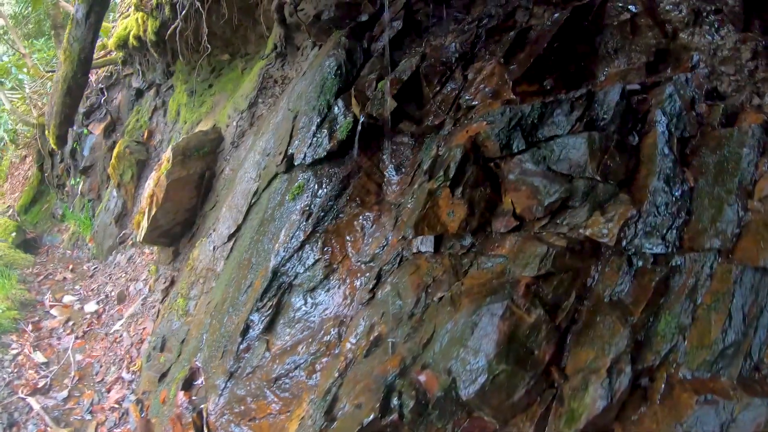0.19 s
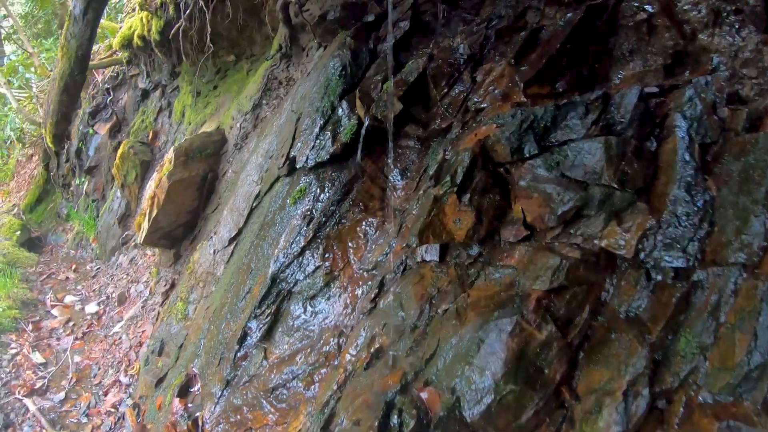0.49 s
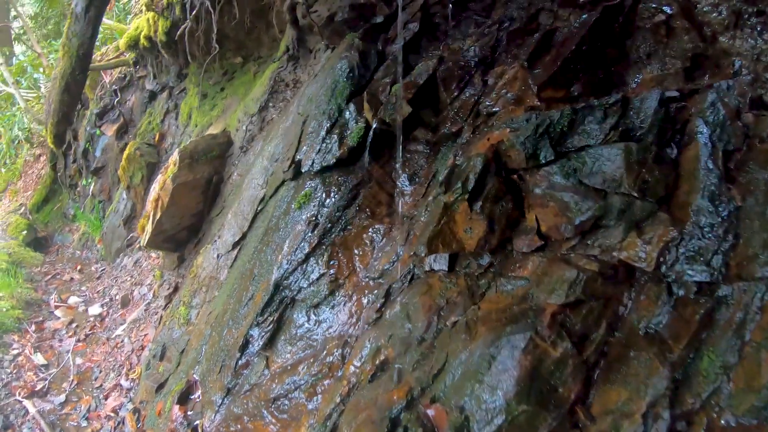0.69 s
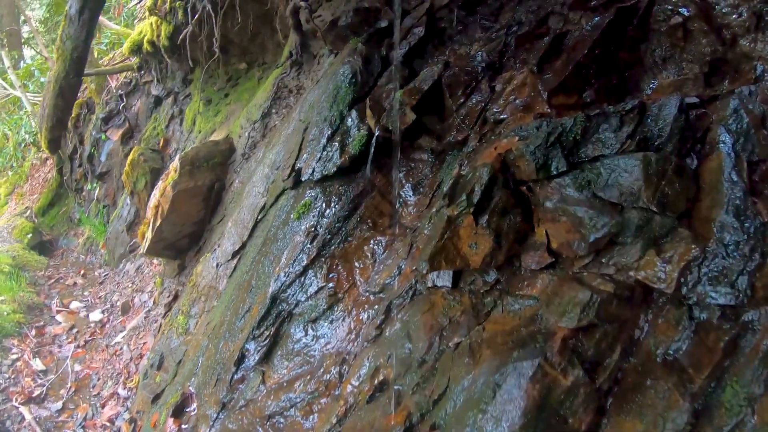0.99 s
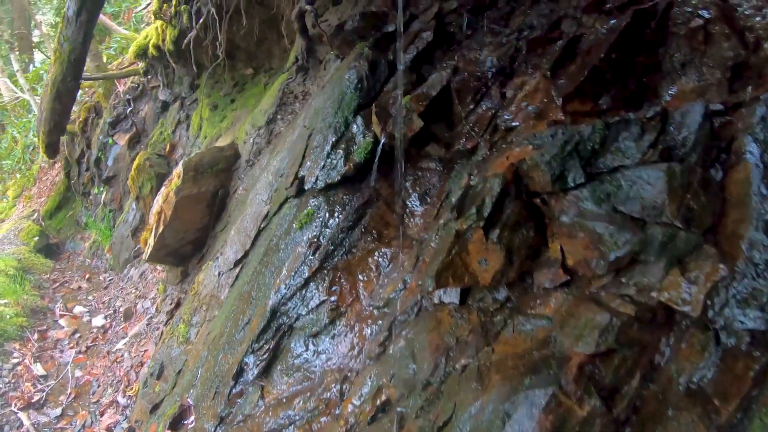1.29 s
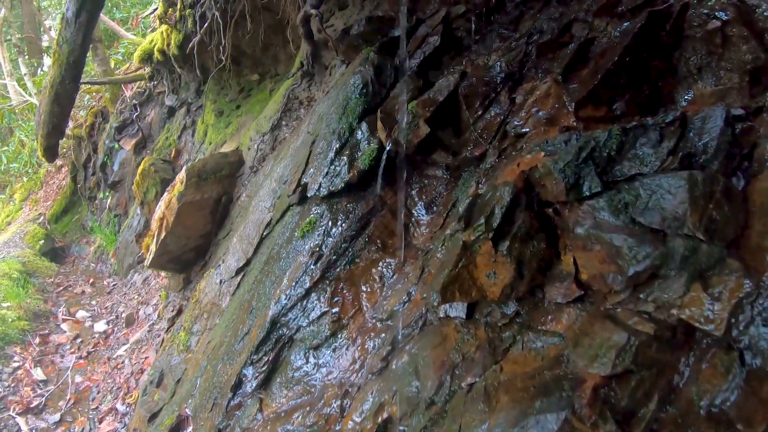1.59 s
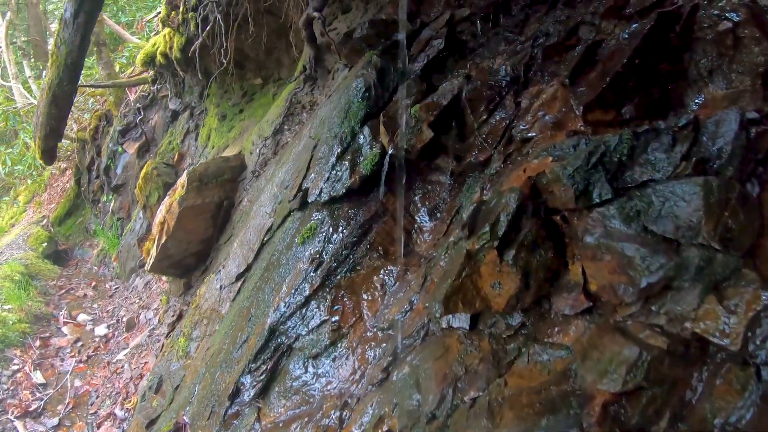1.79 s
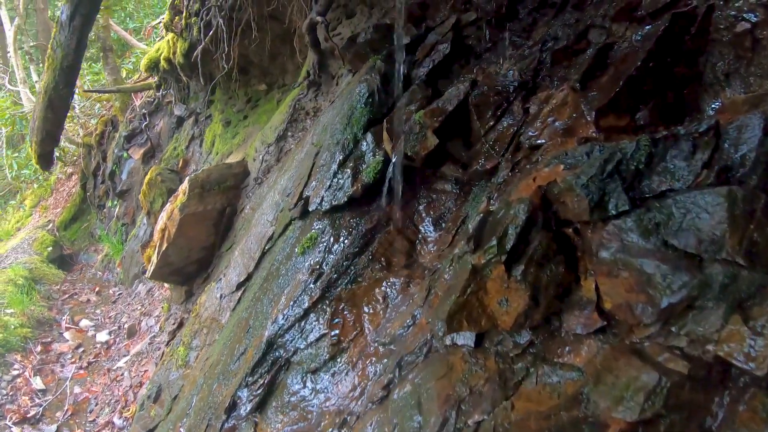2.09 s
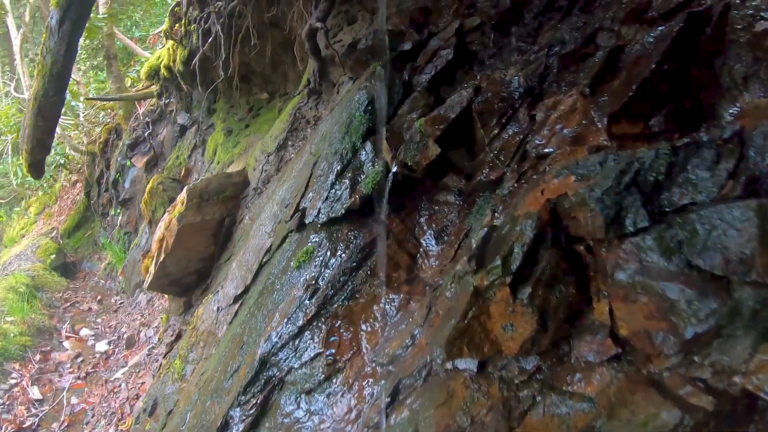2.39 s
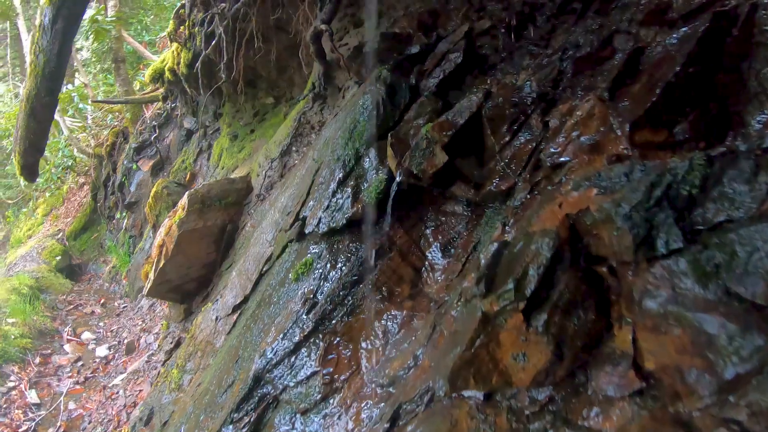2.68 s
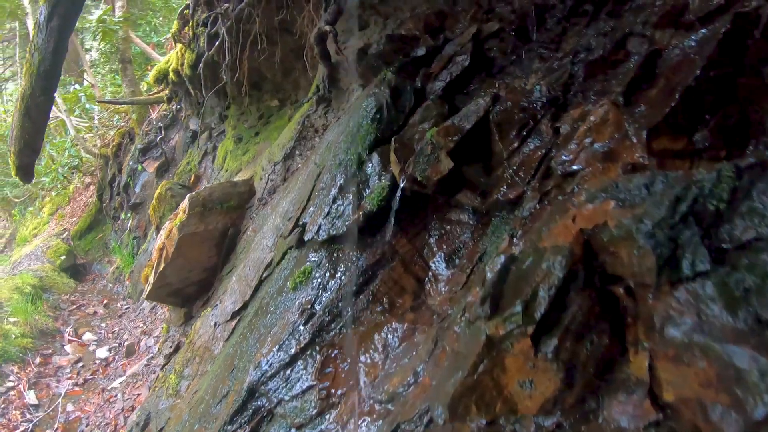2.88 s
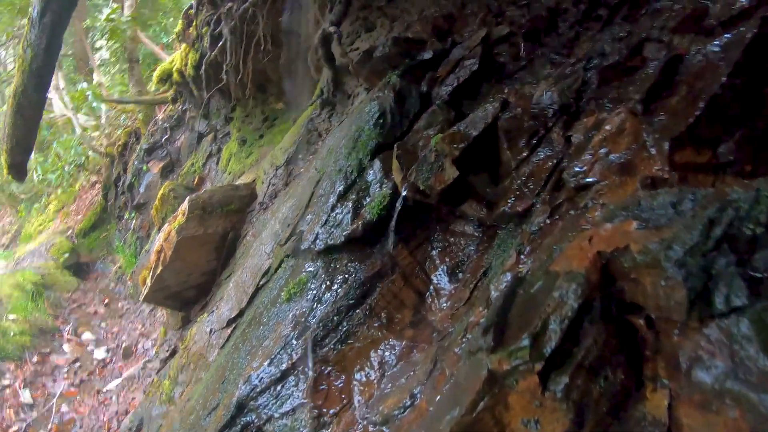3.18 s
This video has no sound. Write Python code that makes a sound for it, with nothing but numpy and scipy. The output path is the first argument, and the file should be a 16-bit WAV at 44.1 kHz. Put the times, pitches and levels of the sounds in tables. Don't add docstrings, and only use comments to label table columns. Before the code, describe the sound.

Water drips quickly and irregularly on wet rock throughout, about twenty-five bright pops and hissy little splashes a second, close in stereo with short dense rock echoes. Louder plinks land near 0.25 and 0.46 seconds, the strongest at 0.68, others at 0.9, 1.26, 1.78, 2.37 and 2.62. Low plops come at 0.83, a gulp at 2.37. Fine patter, a thin trickle and faint forest air continue underneath.

```python
import sys
import numpy as np
from scipy import signal
from scipy.fft import rfft, irfft
from scipy.io import wavfile
from scipy.ndimage import uniform_filter1d, map_coordinates

SR = 44100
rng = np.random.default_rng(int(sys.argv[2]) if len(sys.argv) > 2 else 0)


def bounce(signal):
    frames = np.transpose(np.atleast_2d(signal))
    limited = np.clip(frames, -1, 1)
    pcm = np.round(limited * 32767).astype(np.int16)
    wavfile.write(sys.argv[1], SR, pcm)


def invert_db(level):
    return 10 ** (np.asarray(level, dtype=float) / 20)


N = 147735
LENGTH = 8192
ROCK_ECHO_DB = 3.5
LUMP_DB = 1.5
PATCH_DB = 2.5
POOL_CYCLES = 14


def unit(x):
    return x / np.sqrt(np.mean(x ** 2) + 1e-20)


def along(points, hz):
    f, v = np.transpose(points)
    return np.interp(np.log(hz + 1), np.log(f + 1), v)


def wobble(rate, size):
    knots = rng.standard_normal(int(size * rate / SR) + 4)
    return map_coordinates(knots, [np.arange(size) * rate / SR])


def pair(mid, side):
    # pitch_hz, likeness [0 to 1]
    likeness = [(300, 0.28), (1400, 0.13), (2200, 0.69), (3300, 1), (6800, 0.12), (14000, 0.053)]
    size = mid.shape[-1]
    turn = np.arccos(np.clip(along(likeness, np.fft.rfftfreq(size, 1 / SR)), -1, 1)) / 2
    a = rfft(mid) * np.cos(turn)
    b = rfft(side) * np.sin(turn)
    return irfft(np.array([a + b, a - b]), size)


def rush(spectrum, patchy_db):
    _, _, z = signal.stft(rng.standard_normal((2, N + 512)), SR, nperseg=512)
    field = uniform_filter1d(rng.standard_normal(z.shape[1:]), size=6, axis=0)
    field = uniform_filter1d(field, size=5, axis=1)
    mid, side = signal.istft(z * invert_db(patchy_db * unit(field)), nperseg=512)[1][:, :N]
    both = rfft(pair(mid, side)) * invert_db(along(spectrum, np.fft.rfftfreq(N, 1 / SR)))
    return unit(irfft(both, N))


def echoes():
    # pitch_hz, t60_s
    rock_decay = [(300, 0.84), (700, 0.09), (3000, 0.1), (10000, 0.25)]
    near_db, near_t60_s = 12.5, 0.051
    gap_s = 0.0013
    size = LENGTH // 2
    hz, t, z = signal.stft(rng.standard_normal((2, size)), SR, nperseg=128)
    far = invert_db(-60 * t / along(rock_decay, hz)[:, None])
    near = invert_db(near_db - 60 * t / near_t60_s)
    tail = signal.istft(z * (far + near), SR, nperseg=128)[1][:, :size]
    tail = pair(*(tail * invert_db(LUMP_DB * wobble(474, size))))
    tail = tail / np.sqrt(np.sum(tail ** 2) / 2)
    return np.pad(tail, ((0, 0), (round(gap_s * SR), 0)))[:, :size]


def bubble(hz, cycles, t):
    soft_turns, pitch_rise = 0.6, 0.042
    turns = hz * t
    swell = (1 - np.exp(-turns / soft_turns)) ** 2 * invert_db(-60 * turns / cycles)
    return swell * np.sin(2 * np.pi * turns * (1 + pitch_rise * np.minimum(turns / cycles, 1) / 2))


def add(out, s, db, sound, pitch_hz, echo_db):
    side_db, side_spread_db = -3.5, -0.7
    lag_s, travel_s = 0.00004, 0.000244
    wall_s, wall_db = 0.0043, -7
    hz = np.fft.rfftfreq(LENGTH, 1 / SR)
    ears = np.array([[.5], [-.5]])
    where = rng.standard_normal(2)
    delay_s = ears * lag_s * (1 + where[1]) + travel_s
    direct = invert_db(ears * (side_db + side_spread_db * where[0])) * np.exp(-2j * np.pi * hz * delay_s)
    wall = 1 + invert_db(wall_db) * np.exp(-2j * np.pi * hz * wall_s)
    u = 1j * hz / (0.48 * pitch_hz)
    thin = (u * u / (1 + np.sqrt(2) * u + u * u)) ** 2
    path = direct * wall + invert_db(echo_db) * rfft(echoes(), LENGTH)
    heard = irfft(rfft(sound, LENGTH) * thin * path, LENGTH)
    out[:, round(s * SR):][:, :LENGTH] += invert_db(db) * heard / np.abs(heard.mean(axis=0)).max()


def bare_bubbles(events, gain_db, cycles, echo_db):
    out, t = np.zeros((2, N + LENGTH)), np.arange(LENGTH // 4) / SR
    for s, db, hz in events:
        add(out, s, db + gain_db, bubble(hz, cycles, t), hz, echo_db)
    return out[:, :N]


def forest():
    # pitch_hz, level_db [per Hz]
    air_colour = [(82, -34), (140, -8), (171, 5.5), (204, 6.5), (549, 0), (732, -4.5), (933, -9),
                  (1200, 2.5), (1560, -1.5), (2640, -120)]
    # time_s, level_db
    air_swell = [(0.0, -75), (0.33, -77.5), (1.17, -74.5), (1.6, -75.5), (1.92, -73.5), (2.32, -77.5),
                 (2.96, -75.5), (3.35, -76.5)]
    s, db = np.transpose(air_swell)
    swell_db = np.interp(np.arange(N) / SR, s, db - db.mean())
    return invert_db(-70.5 + swell_db) * rush(air_colour, PATCH_DB)


def trickle():
    # pitch_hz, level_db [per Hz]
    film_colour = [(420, -39), (700, -1.5), (2200, -3.5), (5500, -10.5), (8500, -11), (11000, -15.5),
                   (13800, -32), (15500, -49)]
    flow_db = 2 * wobble(20.0, N)
    return invert_db(-63 + flow_db) * rush(film_colour, PATCH_DB)


def patter(level_db, pitch_hz, cycles, count):
    pitch_spread, size_db = 0.45, 3.5
    t, out = np.arange(256) / SR, 0
    for group in range(3):
        u, g = rng.random((count, 2)), rng.standard_normal(count)
        hz = np.clip(pitch_hz * np.exp(pitch_spread * g), 3000, 13000)[:, None]
        grains = bubble(hz, cycles, t) * invert_db(-size_db * np.log(u[:, 1:] + .03))
        at = (u[:, :1] * N).astype(int) + np.arange(len(t))
        line = np.bincount(at.ravel(), grains.ravel())[None]
        tail = invert_db(ROCK_ECHO_DB) * echoes()
        tail[[0, 1], [2 * group, 4 - 2 * group]] += 1
        heard = signal.fftconvolve(line, tail, axes=1)
        out = out + np.pad(heard, ((0, 0), (0, N)))[:, :N]
    return invert_db(level_db) * unit(out)


def droplets():
    return patter(level_db=-61, pitch_hz=4800, cycles=14, count=200)


def froth():
    return patter(level_db=-62, pitch_hz=7060, cycles=7, count=500)


def echoing_bubbles():
    # start_s, peak_db, pitch_hz
    echoing_events = [
        (0.83, -55, 292),
        (0.959, -61.5, 278),
        (1.24, -60.5, 390),
        (2.367, -41, 1133),
    ]
    return bare_bubbles(echoing_events, 0, POOL_CYCLES, 2 * ROCK_ECHO_DB)


def pool_plops():
    # start_s, peak_db, pitch_hz
    plop_events = [(0.165, -42, 904), (0.832, -41.5, 648), (1.018, -51, 984), (1.151, -51.5, 1024),
                   (1.519, -50.5, 1700), (2.012, -49.5, 1520), (2.176, -47.5, 1124), (2.368, -42, 1540),
                   (2.479, -41, 1740), (2.568, -60, 1740), (3.09, -43.5, 1700)]
    return bare_bubbles(plop_events, 1, POOL_CYCLES, 1)


def clear_bubbles():
    # start_s, peak_db, pitch_hz
    ring_events = [(.163, -37, 3060), (0.2456, -30, 4780), (0.2459, -39, 3640), (.27, -36, 7150),
                   (.277, -39, 3370), (0.284, -39, 3950), (.289, -46, 2700), (0.4634, -26.5, 3400),
                   (.465, -27.5, 6260), (0.6275, -44, 7660), (0.6836, -23, 2223), (0.682, -24, 4360),
                   (.767, -43.5, 8600), (.836, -39, 2290), (1.3857, -44, 5000), (2.038, -42, 3300),
                   (2.058, -42.5, 3200), (2.075, -39, 6600), (2.155, -43, 2500), (2.176, -36, 6500),
                   (2.201, -52, 5000), (2.2537, -38.5, 2860), (2.277, -46, 7050), (2.3655, -25.5, 5450),
                   (2.394, -45, 1990), (2.51, -38.5, 4070), (2.602, -38, 3930), (2.602, -38, 6000),
                   (2.6196, -23.5, 2580), (2.648, -48, 9600), (2.8715, -37, 5800), (2.885, -34, 3370),
                   (3.2535, -46.5, 3160),
                   (.003, -48.5, 1270), (.024, -38, 5800), (0.132, -42, 9000), (.385, -47.5, 3800),
                   (.517, -45, 5000), (.591, -45, 5940), (.736, -46.5, 6400), (.835, -47, 1016),
                   (0.837, -51.5, 510), (.985, -52, 4730), (1.118, -40, 5000), (1.165, -48.5, 2700),
                   (1.192, -40, 6200), (1.202, -43.5, 3470), (1.256, -37, 5300), (1.3, -44, 4000),
                   (1.554, -33, 4150), (1.569, -44, 7000), (1.587, -37.5, 2980), (1.596, -36.5, 1890),
                   (1.645, -41, 3420), (1.747, -46, 6600), (1.826, -40, 6100), (1.859, -40, 3330),
                   (1.897, -42, 2690), (1.91, -40, 5370), (1.938, -44.5, 3520), (1.964, -46.5, 3100),
                   (2.178, -42, 2600), (2.185, -46, 1410), (2.342, -51, 1920), (2.527, -44, 4130),
                   (2.77, -32.5, 9470), (2.803, -33, 5000), (2.99, -38, 3300), (3.0, -40.5, 2330),
                   (3.084, -41, 2610), (3.136, -37, 5000), (3.168, -36, 7300), (3.295, -47, 1680)]
    return bare_bubbles(ring_events, 0, 18, -1)


def spray(t):
    # pitch_hz, level_db [per Hz]
    spray_colour = [(500, -30), (1200, -2), (2600, -11.5), (4500, -3.5), (7500, -3.5), (10000, -8.5),
                    (12000, -18.5), (15000, -22.5)]
    build_s, t60_s, late_s = 0.0037, 0.0048, 0.0004
    hz = np.fft.rfftfreq(len(t), 1 / SR)
    colour = invert_db(along(spray_colour, hz)) * np.exp(-2j * np.pi * hz * late_s)
    u = t / (build_s * rng.random() ** 2 + t60_s / 10)
    burst = rng.laplace(size=len(t)) * u * np.exp(-u)
    lumps = invert_db(LUMP_DB * wobble(SR / 60, len(hz)))
    hiss = irfft(rfft(burst) * colour * lumps)
    return hiss / np.abs(hiss).max()


def rock_drops():
    # start_s, peak_db, pitch_hz, spray_db [over the bubble]
    drop_events = [(0.0388, -35, 2940, -2.5), (0.071, -32.5, 3850, -8), (0.1097, -30, 5970, -40),
                   (0.131, -33.5, 6000, -16), (0.15, -32.5, 3380, 3.5), (0.2468, -19, 4340, -25),
                   (0.2992, -30.5, 6140, -25), (0.3278, -26.5, 5500, -11), (0.3703, -41.5, 3320, -9),
                   (0.4386, -39.5, 3530, -6), (0.4626, -22, 3720, -14.5), (0.53, -34, 3700, -5),
                   (0.5614, -28.5, 5700, -6.5), (0.6423, -32.5, 2970, -15.5), (0.6829, -12.5, 2905, -25),
                   (0.737, -55, 6400, -21), (0.7834, -32, 5300, -7.5), (0.8111, -35.5, 2900, -2),
                   (0.8432, -30, 4000, -14), (0.885, -39, 8100, -24), (0.907, -22.5, 3560, -16.5),
                   (0.9349, -34, 3600, -10), (1.0159, -32, 3370, -7.5), (1.077, -35, 7600, -3),
                   (1.102, -29, 5200, 8),
                   (1.1504, -30.5, 7050, -7.5), (1.1907, -39, 5960, -18), (1.2397, -33, 5460, -4),
                    (1.2617, -23.5, 3050, -17), (1.3175, -40.5, 1830, 4), (1.345, -33, 3620, -5.5),
                    (1.403, -31, 4040, -12.5), (1.4383, -39.5, 4360, -14), (1.476, -37.5, 3170, -28),
                    (1.5204, -43, 1590, -2), (1.5505, -32, 4060, -13), (1.5924, -27.5, 2700, -12.5),
                    (1.6216, -28.5, 2820, -11), (1.6601, -34.5, 4800, -9), (1.692, -32, 6900, 15),
                    (1.7121, -31.5, 3580, -31), (1.7773, -20, 2930, -17), (1.8569, -35, 3260, -4.5),
                    (1.892, -30.5, 7340, -10), (1.9405, -36, 5700, -6), (1.9584, -38, 3070, 9),
                    (1.9798, -33.5, 8800, -28), (2.008, -36.5, 6430, -17), (2.0434, -28, 3460, 4.5),
                    (2.088, -34.5, 5600, 1), (2.12, -39, 9200, -32), (2.152, -26.5, 7900, -6.5),
                   (2.2533, -32, 2410, -18), (2.293, -36, 5640, -11), (2.3156, -33.5, 7100, -38),
                  (2.3657, -19.5, 3030, -6.5), (2.4325, -33.5, 7500, 10), (2.4875, -35.5, 2830, -5),
                  (2.5664, -33.5, 1800, -0.5), (2.608, -30.5, 8300, 4), (2.6167, -23.5, 4360, -11),
                  (2.6528, -36.5, 2530, -6), (2.688, -34, 7300, -10.5), (2.7071, -31.5, 3120, -12),
                  (2.768, -27.5, 4870, 10), (2.802, -33, 4900, -9), (2.8771, -27.5, 6900, -10),
                  (2.926, -43, 8960, -46), (2.9626, -43, 4550, -3), (2.9804, -31, 2830, -2.5),
                  (3.0283, -35.5, 6600, -23), (3.067, -26.5, 6640, -6.5), (3.1226, -34, 3550, -2.5),
                  (3.157, -28.5, 3250, -7), (3.2153, -32.5, 6350, -14), (3.2612, -34.5, 6800, -2.5),
                  (3.2914, -30.5, 3860, -14),
                   (0.0074, -36.5, 5600, 5),
        (1.0316, -41, 2650, -16),
        (1.8012, -26, 4600, -22),
        (2.6, -36, 2440, 7),
        (2.7561, -41, 5130, -22),
        (3.3414, -33.5, 3630, -8),
    ]
    out, t = np.zeros((2, N + LENGTH)), np.arange(LENGTH // 4) / SR
    for s, db, hz, spray_db in drop_events:
        hiss = spray(t)
        pop = bubble(hz, 6.07 - 0.02 * (db + 14), t)
        splash = pop / pop.max() + invert_db(4.5 + spray_db) * hiss
        add(out, s, db - 2.5, splash, min(hz, 3500), ROCK_ECHO_DB)
    return out[:, :N]


def scene():
    background = forest() + trickle() + droplets() + froth()
    water = echoing_bubbles() + pool_plops() + clear_bubbles()
    return background + water + rock_drops()


def band_limit(x):
    return signal.sosfilt(signal.butter(12, 15740, fs=SR, output="sos"), x)


def record(dry):
    port_hz, port_width_hz, port_db = 9880, 1000, -1
    low_cut = signal.butter(6, 119, "high", fs=SR, output="sos")
    top_cut = signal.butter(8, 14100, "low", fs=SR, output="sos")
    resonance = signal.lfilter(*signal.iirpeak(port_hz, port_hz / port_width_hz, SR), dry)
    port = dry + invert_db(port_db) * resonance
    self_noise = invert_db(-108) * rush([(110, 0), (400, -50)], 0)
    mix = signal.sosfilt(np.vstack([low_cut, top_cut]), port) + self_noise
    return band_limit(mix)


dry = scene()
out = record(dry)
bounce(out)
```